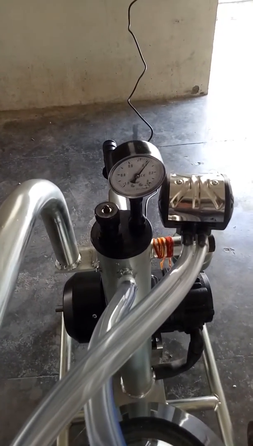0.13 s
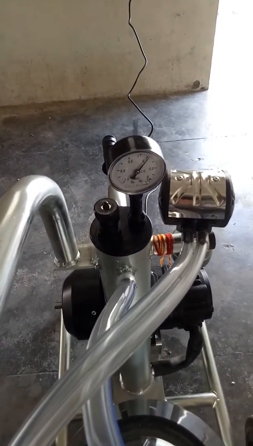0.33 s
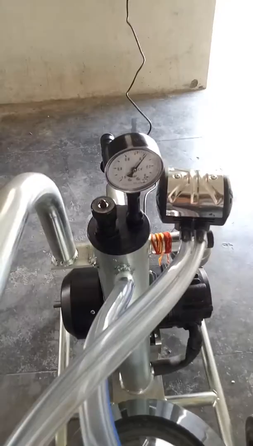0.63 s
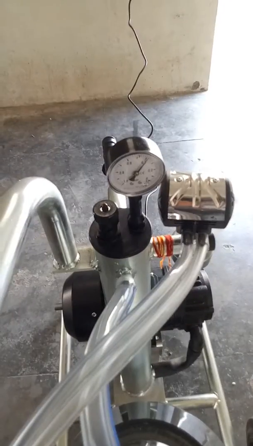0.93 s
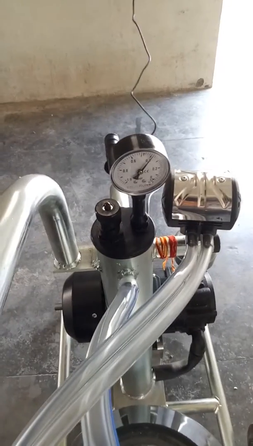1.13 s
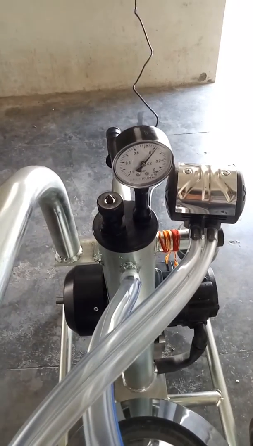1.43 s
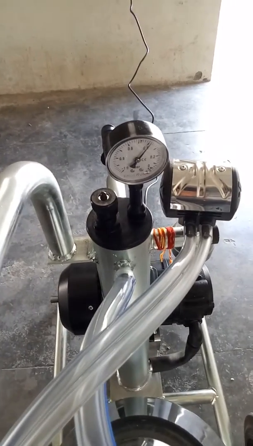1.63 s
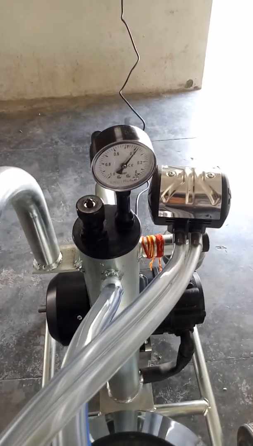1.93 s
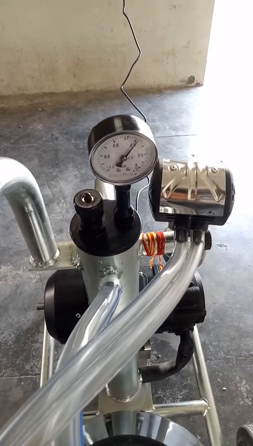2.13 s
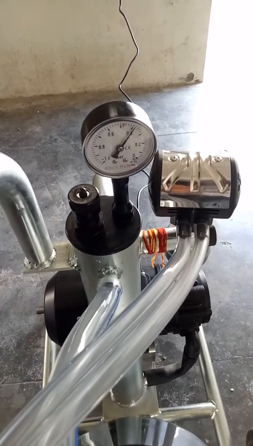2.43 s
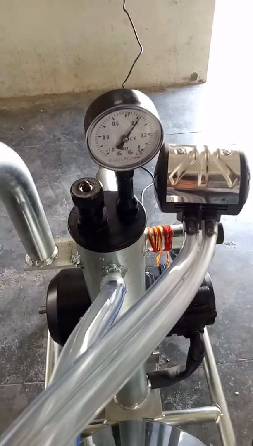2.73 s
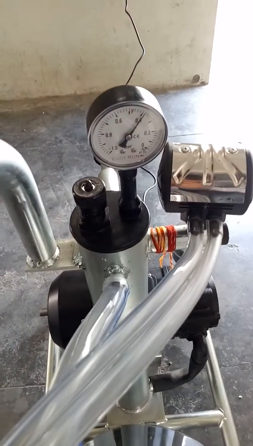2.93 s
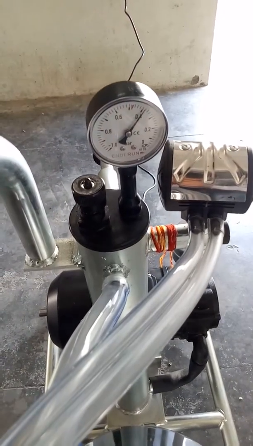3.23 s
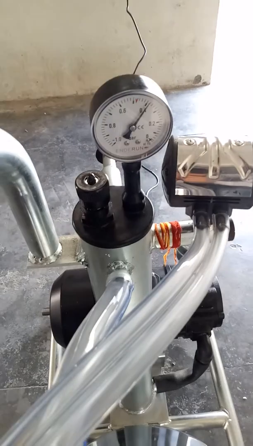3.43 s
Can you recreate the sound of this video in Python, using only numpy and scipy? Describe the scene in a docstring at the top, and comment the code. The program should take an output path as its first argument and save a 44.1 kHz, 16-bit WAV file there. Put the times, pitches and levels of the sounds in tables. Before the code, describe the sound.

The steady drone of a milking machine's vacuum pump mixes with rushing air, ringing scrape and a light high squeal. Sharp valve clicks repeat evenly, roughly every half second, close to a phone microphone in a bare room.

```python
"""The four-vane vacuum pump of a portable milking machine runs in a bare room.
It hums on its shaft orders, its vanes scrape the casing into ringing, and friction makes it squeal.
The pulsator valve clacks over about twice a second, air hisses, and one thin tick sounds.
A hand-held phone drifts nearer; its limiter ducks everything at the loudest peaks."""
import sys
import numpy as np
from scipy import signal
from scipy.fft import rfft, irfft, next_fast_len
from scipy.io import wavfile
from scipy.ndimage import uniform_filter1d, minimum_filter1d, map_coordinates

SR = 44100
rng = np.random.default_rng(int(sys.argv[2]) if len(sys.argv) > 2 else 0)


def transcribe(u):
    """Save the signal u as a 16-bit wav file named by the first command-line argument.

    u: samples, shape (n,) or (channels, n), limited to [-1, 1]; the rate is SR.
    q: integer samples, one column per channel.
    """
    v = np.clip(np.atleast_2d(u).T, -1, 1)
    q = np.round(v * 32767).astype(np.int16)
    wavfile.write(sys.argv[1], SR, q)


N = 158760
SHAFT_HZ, VANES, TOP_HZ = 23.977, 4, 15300


# exhaust hum, body buzz: (shaft multiple [rounded in use], level [dB], left-right [dB])
HUM_ORDERS = [(4, -43.5, 8), (8.164, -40.5, 5), (11, -56.5, -3), (12, -34, 6), (15.5, -57.5, 2),
              (16, -47.5, 12.5), (20, -41.5, -1.5), (24.52, -53, -4), (24.4, -50.5, 8), (28.47, -46, 13.5),
              (29, -58, -3), (30.3, -57.5, -3.5), (31.47, -52, 9), (35.1, -73, -48), (39.5, -60.5, -25.5),
              (43, -52, 1)]
# lowest order as the phone nears: (time [s], gain [dB])
LOWEST_ORDER_DB = [(0, -3), (.9, 0), (1.8, .3), (2.7, 1.7), (3.6, -1)]
def pump_hum():
    """Shaft orders line up into exhaust pulses; each wavers, the lowest most."""
    left_lead_s, skew_rad = .0001, -.31
    t = np.arange(N) / SR + np.array([[left_lead_s], [0]])
    orders = []
    for multiple, db, pan_db in HUM_ORDERS:
        peak = np.sqrt(2) * amp(db + 1.25 * wobble(rate_hz=6.3))
        phase = 2 * np.pi * round(multiple) * SHAFT_HZ * t + skew_rad + .3 * wobble(rate_hz=3.07)
        orders.append(peak * pan(pan_db) * np.cos(phase))
    lowest_db = curves(LOWEST_ORDER_DB)[0] + 1.5 * wobble(rate_hz=8.06)
    return amp(lowest_db) * orders[0] + sum(orders[1:])


# casing resonances: (frequency [Hz], width [Hz], relative level [dB])
CASING_MODES = [(1044, 55, -19), (1300.6, 27.5, -1), (1363, 39.6, -0.5), (1438, 58, -19.5),
                (1600.5, 7.3, -4.5), (1922, 33, -7.5), (2156, 80, -8), (3484, 47, -10.5)]
def vane_scrape():
    """Vane scrape nearly repeats every turn and rings the casing."""
    memory_turns, repeat_share, correlation = 6.5, .59, .31
    feedback = np.exp(-1 / memory_turns)
    comb = lambda hz: 1 / (1 - feedback * np.exp(-2j * np.pi * hz / SHAFT_HZ))
    repeating = unit_rms(filtered(noise_pair(correlation), comb))
    scrape = np.sqrt(repeat_share) * repeating + np.sqrt(1 - repeat_share) * noise_pair(correlation)
    return amp(-25) * pan(12) * resonate(CASING_MODES, scrape)


# three squeal groups, one steady shrill group: (frequency [Hz], width [Hz], relative level [dB])
LOW_MODES = [(4020, 50, -14), (4140, 46, 0), (4240, 100, -9.5)]
MID_MODES = [(4345, 18, -6), (4382, 22, 0), (4412, 25, -8)]
HIGH_MODES = [(5050, 55, 0), (5105, 50, -3), (5170, 28, -3)]
SHRILL_MODES = [(6020, 100, -3), (6361, 35, 2), (6635, 60, -1), (7075, 54, -3), (8930, 260, -8)]
# group levels as the phone moves: (time [s], low [dB], mid [dB], high [dB])
SQUEAL_DB = [(0, -18, -16, -17), (.4, -16.5, -21, -21.5), (.8, -18, -19, -21.5), (1.2, -18, -21.5, -21),
             (1.6, -19.5, -21.5, -24.5), (2, -17.5, -24.5, -21.5), (2.4, -20.5, -19.5, -23),
             (2.8, -20.5, -21.5, -21), (3.2, -19, -26, -20.5), (3.6, -21, -27, -19)]
# squeal balance: (time [s], left-right [dB])
SQUEAL_PAN_DB = [(0, .5), (1.2, .3), (1.6, 3), (2.1, 3.8), (3.6, 3.5)]
def pump_squeal():
    """Friction noise drives narrow high modes of the pump."""
    squeal = 0
    for modes, db in zip((LOW_MODES, MID_MODES, HIGH_MODES), curves(SQUEAL_DB)):
        flutter_db = .7 * wobble(rate_hz=16)
        squeal += amp(db + flutter_db) * resonate(modes, noise_pair(correlation=.73))
    shrill = amp(-35) * pan(9.4) * resonate(SHRILL_MODES, noise_pair(correlation=.033))
    return pan(curves(SQUEAL_PAN_DB)[0]) * squeal + shrill


# valve changeovers: (time [s], strength [dB], left-right [dB])
CHANGEOVERS = [(0.146, -12, 7.5), (0.6658, -12, 10), (1.2137, -10.5, 7), (1.7306, -9.5, 14),
               (2.2773, -11, 9.5), (2.7974, -16, 21.5), (3.3448, -16, 22)]
# valve resonances: (frequency [Hz], relative level [dB], T60 [s])
VALVE_MODES = [(2150, -6, .03), (2500, -4, .03), (2900, -5, .03), (3300, -2, .03), (3650, -1, .03),
               (4200, -2, .012)]
# crack filter: (frequency [Hz], gain [dB])
CRACK_EQ_DB = [(1300, -40), (1900, -3), (3600, -.5), (4600, -5), (5600, -35)]
def pulsator():
    """The valve slide hits its stop and chatters: a ring, a crack and a low thump per hit."""
    bounce_s, bounce_loss_db, attack_s = .005, 9, .0004
    crack_db, crack_t60_s, thump_hz = 11, .008, 70
    bodies, cracks = np.zeros((2, 2, N + SR))
    t = np.arange(SR // 10) / SR
    thump = amp(-30) * np.sin(2 * np.pi * thump_hz * t) * np.exp(-t / .008)
    for start_s, db, pan_db in CHANGEOVERS:
        for bounce in range(4):
            ring = 0
            for hz, mode_db, t60_s in VALVE_MODES:
                decay = amp(mode_db + rng.normal(0, .74) - 60 * t / t60_s)
                ring += decay * np.sin(2 * np.pi * (hz * t + rng.random()))
            crack = amp(crack_db - 60 * t / crack_t60_s) * rng.standard_normal(len(t))
            at = round((start_s + bounce_s * bounce) * SR)
            gain = amp(db - bounce_loss_db * bounce) * pan(pan_db)
            bodies[:, at:at + len(t)] += gain * (ring * (1 - np.exp(-t / attack_s)) + thump)
            cracks[:, at:at + len(t)] += gain * crack
    return bodies[:, :N] + equalize(cracks[:, :N], CRACK_EQ_DB)


# air rush and treble hiss spectra: (frequency [Hz], relative density [dB])
RUSH_EQ_DB = [(15, -67), (25, -29), (87, -23.5), (234, -19), (286, -12.5), (340, -18), (481, -13.5),
              (1120, -20.5), (1330, -1.5), (1510, -6), (2740, -10), (3790, -6.5), (4740, -12), (5500, -11),
              (9100, -21.5), (9600, -80), (20000, -120)]
HISS_EQ_DB = [(9000, -26), (9700, -9), (10300, 0.5), (11000, 3.5), (12000, 2.5), (12600, -6.5),
              (14200, -2.5), (15200, -46)]
# rush stereo width: (frequency [Hz], left-right correlation [0..1])
RUSH_CORRELATION = [(30, .4), (70, 0.99), (150, 1), (380, 0.44), (940, 0.57), (2360, 0.28), (5900, 0.064)]
# rush balance: (frequency [Hz], left-right [dB])
RUSH_PAN_DB = [(60, 15), (120, 20), (240, 18), (470, 3.4), (940, 14), (1880, 2.8), (3740, 6), (7440, 2.9),
               (14800, 28)]
# treble hiss envelope: (time [s], level [dB])
HISS_DB = [(0.0, -48), (1.21, -47), (1.48, -46), (1.74, -48), (2.43, -44), (2.62, -45), (3.6, -48.5)]
def air():
    """Broad air rush and treble hiss; the upper band puffs with each vane."""
    puff_depth, puff_from_hz = .14, 5200

    def mid_side(hz):
        angle = np.arccos(log_interp(RUSH_CORRELATION, hz)) / 2
        return amp(log_interp(RUSH_EQ_DB, hz)) * [np.cos(angle), np.sin(angle)]

    mid, side = filtered(rng.standard_normal((2, N)), mid_side)
    rush = filtered(np.array([mid + side, mid - side]), lambda hz: pan(log_interp(RUSH_PAN_DB, hz)))
    rush = amp(-25 + .64 * wobble(rate_hz=4.73)) * unit_rms(rush)
    upper = filtered(rush, lambda hz: hz > puff_from_hz)
    hiss = unit_rms(equalize(rng.standard_normal((2, N)), HISS_EQ_DB))
    hiss *= amp(curves(HISS_DB)[0] + .85 * wobble(rate_hz=14)) * pan(14)
    puff = 1 + puff_depth * np.cos(2 * np.pi * VANES * SHAFT_HZ * np.arange(N) / SR)
    return rush - upper + puff * (upper + hiss)


# thin tick: (time [s], level before filtering [dB])
TICKS = [(2.1061, -19.5)]
def tick():
    """A short, very bright noise burst, strongest at the very top."""
    t60_s, from_hz, top_boost_db = .02, 11000, 12
    bursts, t = np.zeros(N + SR), np.arange(SR // 20) / SR
    for start_s, db in TICKS:
        at = round(start_s * SR)
        bursts[at:at + len(t)] += amp(db - 60 * t / t60_s) * rng.standard_normal(len(t))
    return pan(18) * filtered(bursts[:N], lambda hz: (hz > from_hz) * amp(top_boost_db * (hz > TOP_HZ)))


def room(x, t60_s=.3, delay_samples=300):
    """A short tail off bare walls."""
    tail = rng.standard_normal((2, SR // 2)) * amp(-60 * np.arange(SR // 2) / SR / t60_s)
    delayed = np.pad(x.mean(0), (delay_samples, 0))[None]
    return signal.fftconvolve(delayed, tail / np.linalg.norm(tail[0]), axes=1)[:, :N]


def amp(db):
    """dB to gain."""
    return 10 ** (np.asarray(db) / 20)


def unit_rms(x):
    """Scale to rms 1."""
    return x / np.sqrt(np.mean(x ** 2) + 1e-20)


def pan(db):
    """Left and right gains for a level difference."""
    return amp(np.array([db / 2, -db / 2])).reshape(2, -1)


def log_interp(points, hz):
    """Interpolate on a log frequency axis."""
    knots_hz, values = np.transpose(points)
    return np.interp(np.log(hz + 1), np.log(knots_hz + 1), values)


def curves(rows):
    """One value per sample for each column after the time."""
    times_s, *columns = np.transpose(rows)
    return [np.interp(np.arange(N) / SR, times_s, column) for column in columns]


def wobble(rate_hz):
    """Smooth random curve, rate_hz knots a second."""
    return map_coordinates(rng.standard_normal(400), [np.arange(N) * rate_hz / SR])


def noise_pair(correlation):
    """Left and right white noise with a common part."""
    common, left, right = rng.standard_normal((3, N))
    return np.sqrt(correlation) * common + np.sqrt(1 - correlation) * np.array([left, right])


def filtered(x, response):
    """Apply a complex frequency response."""
    size = next_fast_len(N + SR // 2)
    return irfft(rfft(x, size) * response(np.fft.rfftfreq(size, 1 / SR)), size)[..., :N]


def equalize(x, points):
    """Filter by (frequency [Hz], gain [dB]) points."""
    return filtered(x, lambda hz: amp(log_interp(points, hz)))


def resonate(modes, drive):
    """Parallel resonances of alternating sign, rms 1 per channel."""
    def response(hz):
        return sum((-1) ** k * amp(db) * 1j * hz * width / (centre ** 2 - hz ** 2 + 1j * hz * width)
                   for k, (centre, width, db) in enumerate(modes))
    return np.array([unit_rms(channel) for channel in filtered(drive, response)])


def lag_right(x, lag_s=10 / SR):
    """Sound reaches the right microphone port slightly later."""
    return filtered(x, lambda hz: np.exp(-2j * np.pi * hz * np.array([[0], [lag_s]])))


def scene():
    """Pump, valve, air and tick; only the valve feeds the room tail."""
    valve = pulsator()
    machine = pump_hum() + lag_right(vane_scrape() + pump_squeal() + valve)
    return machine + air() + amp(-7.5) * room(valve) + tick()


def record(dry):
    """Stereo-linked look-ahead limiter on short-time rms, soft clip, band limit."""
    drive_db, threshold, firmness, clip_at = 4, .23, .9, .8
    sense_s, ahead_s, hold_s, smooth_s = .0012, .007, .026, .018
    x = amp(drive_db) * dry
    rms = np.sqrt(np.abs(uniform_filter1d(x ** 2, int(sense_s * SR) + 1)).max(0))
    target_gain = np.minimum(1, threshold / (rms + 1e-9)) ** firmness
    ahead, hold = int(ahead_s * SR), int(hold_s * SR)
    held_gain = minimum_filter1d(target_gain, ahead + hold, origin=(hold - ahead) // 2 - 1)
    limited = x * uniform_filter1d(held_gain, int(smooth_s * SR))
    clipped = limited / (1 + np.abs(limited / clip_at) ** 6) ** (1 / 6)
    return filtered(clipped, lambda hz: hz < TOP_HZ)


dry = scene()
out = record(dry)
transcribe(out)
```